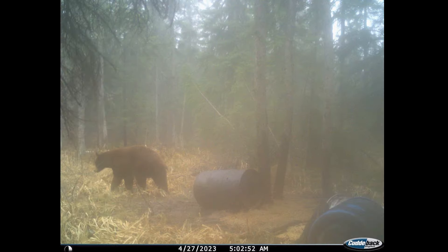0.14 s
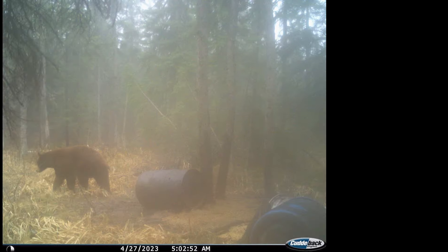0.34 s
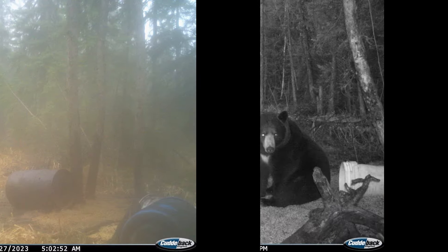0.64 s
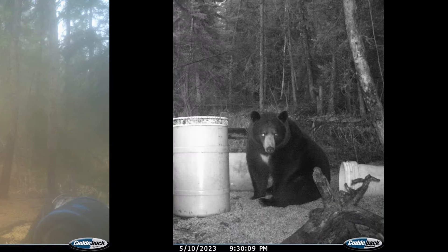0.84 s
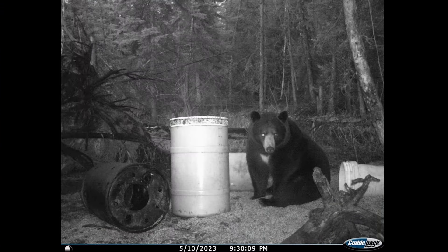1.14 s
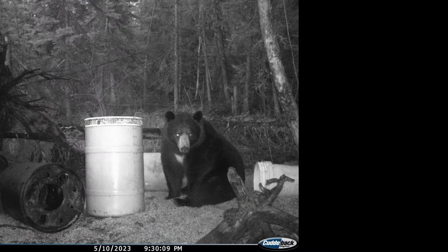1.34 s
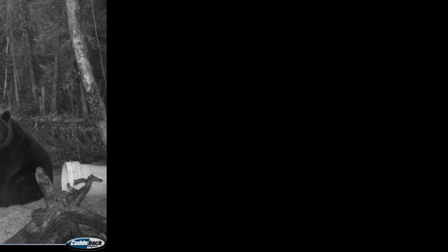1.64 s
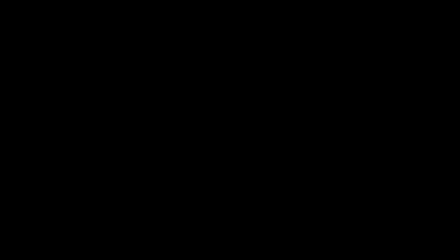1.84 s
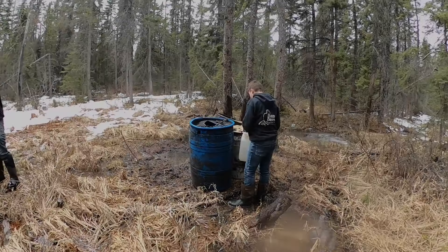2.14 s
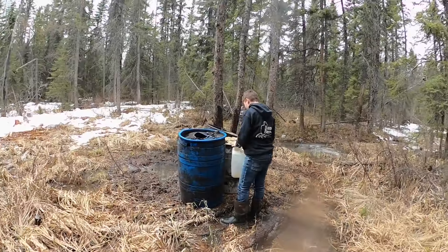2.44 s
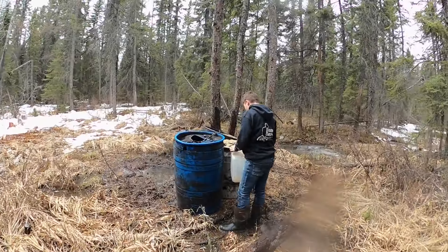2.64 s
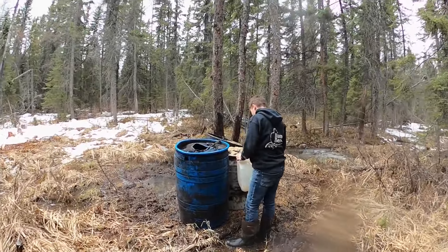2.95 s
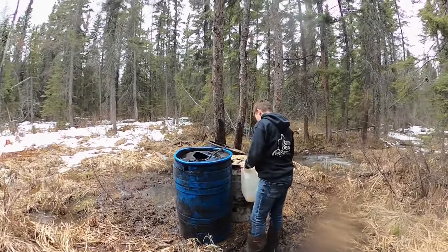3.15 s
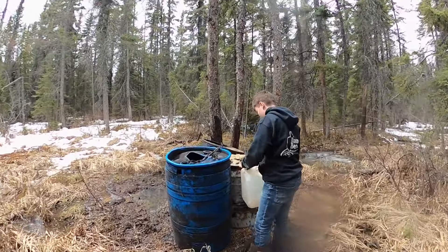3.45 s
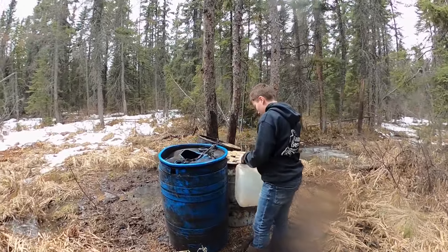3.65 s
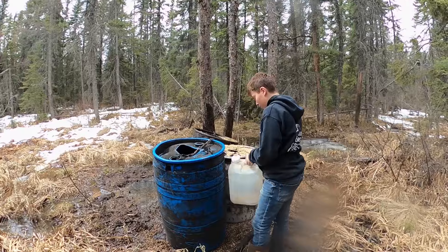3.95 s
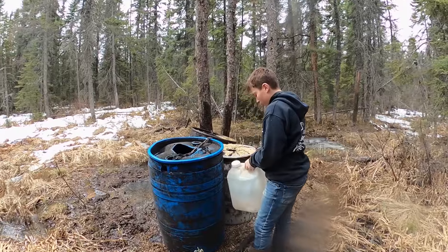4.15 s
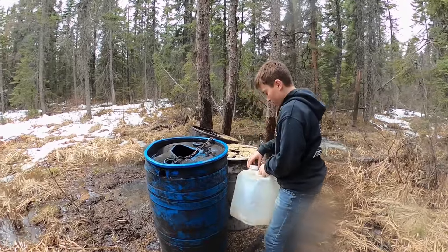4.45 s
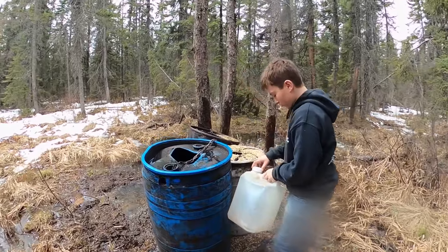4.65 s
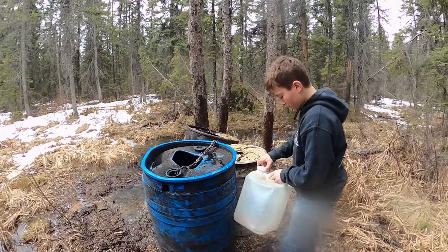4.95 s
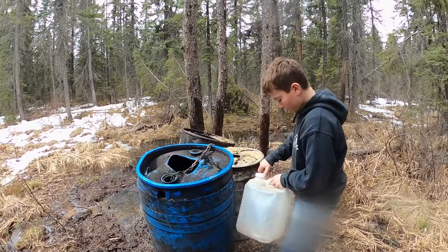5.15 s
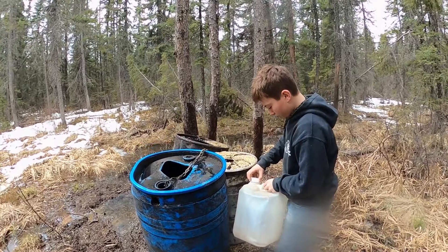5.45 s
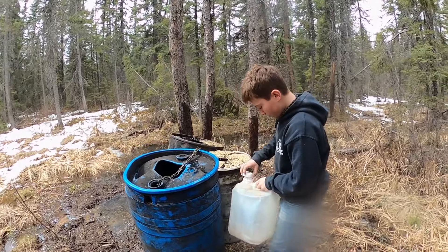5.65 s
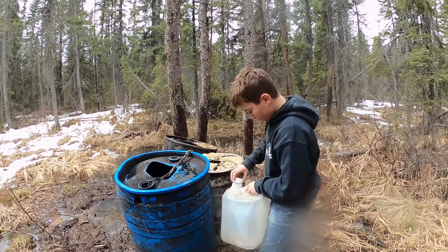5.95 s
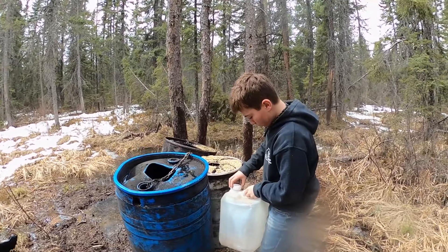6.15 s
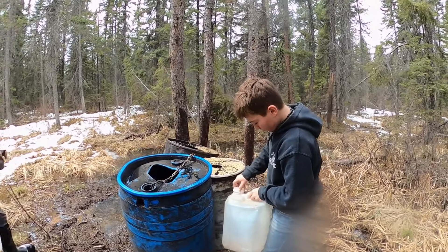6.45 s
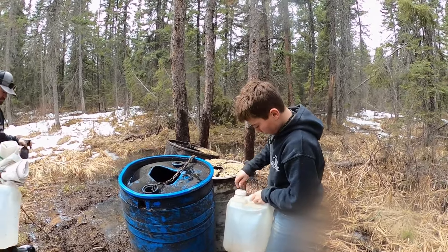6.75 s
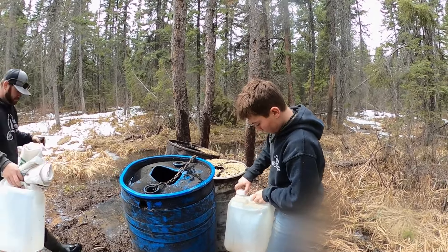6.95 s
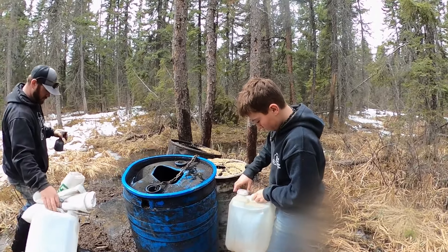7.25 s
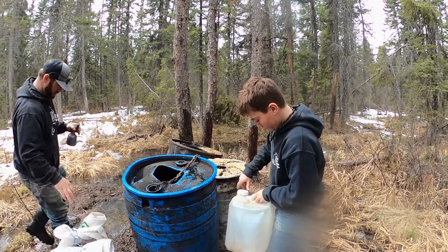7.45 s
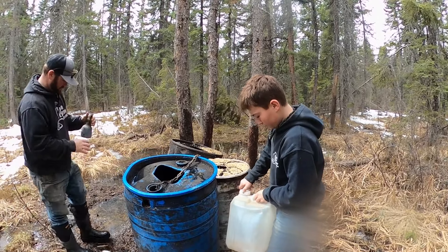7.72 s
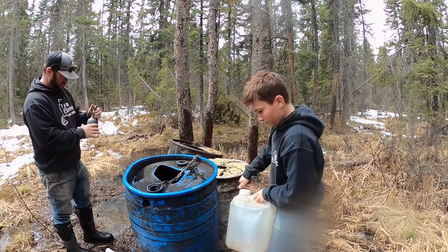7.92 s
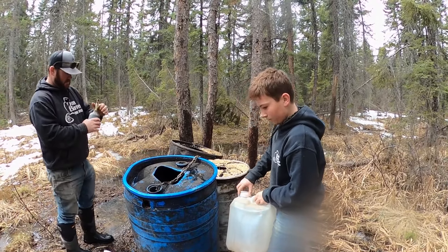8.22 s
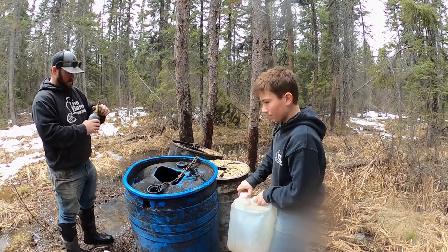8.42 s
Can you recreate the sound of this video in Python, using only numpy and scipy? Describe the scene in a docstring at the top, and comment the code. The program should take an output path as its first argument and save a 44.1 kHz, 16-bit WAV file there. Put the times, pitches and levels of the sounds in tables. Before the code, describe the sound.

Close stereo pickup in a still forest. First only soft air and two hard, dry clicks with small ticks. Rustling swells in and liquid bursts into lively slosh and gurgle, with a dense run of knocks and slaps. Looser splashes and brushing follow, leaning left, then several low, boomy plastic bumps as jugs land on soft ground. The last liquid calms quickly, leaving faint rustle.

```python
"""Plastic jugs of liquid are carried and set down beside a barrel on wet, grassy ground in a quiet wood.
Liquid splashes and glugs as ringing bubbles, hiss and gliding sines; hollow jug walls boom in a few modes.
Sacks and dry grass rustle as dense clicks over hiss; knocks and slaps are short resonant noise.
A latch clicks twice amid finger ticks, all in short ringing modes; wood air and wind are shaped noise."""
import sys
import numpy as np
from scipy import signal
from scipy.fft import rfft, irfft, next_fast_len
from scipy.io import wavfile
from scipy.ndimage import uniform_filter1d, minimum_filter1d

SR = 44100
rng = np.random.default_rng(int(sys.argv[2]) if len(sys.argv) > 2 else 0)


def undo_db(level):
    """Turn decibels back into plain size, where 20 dB means ten times bigger."""
    steps = np.asarray(level, float) / 20
    return 10 ** steps


def generate_wav(signal):
    """Clip the signal to [-1, 1] and save it as 16-bit WAV at the path in sys.argv[1]."""
    frames = np.transpose(np.atleast_2d(signal))
    scaled = np.clip(frames, -1, 1) * 32767
    pcm = np.round(scaled).astype(np.int16)
    wavfile.write(sys.argv[1], SR, pcm)


N = 378378

# Levels in the tables are nominal: each source adds its own trim.
# wood air, middle spectrum: (frequency [Hz], relative density [dB per Hz])
AIR_MID_SPECTRUM = [(30, -30), (100, -11.5), (180, -4), (330, -6.5), (500, -12.5), (900, -23), (1300, -15),
                    (1700, -18.5), (2100, -16), (2500, -28), (3100, -24.5), (4000, -37.5), (7500, -48),
                    (14000, -74)]
# wood air, left-minus-right spectrum: (frequency [Hz], relative density [dB per Hz])
AIR_SIDE_SPECTRUM = [(30, -17), (100, -8), (200, -10), (380, -14), (700, -29), (1300, -17), (2400, -21),
                     (4400, -34), (8000, -43), (14000, -58)]
# wood air level: (time [s], level [dB])
AIR_LEVEL = [(0, -60.5), (.3, -57.5), (.5, -63.5), (.9, -65.5), (1.2, -62), (1.6, -62.5)]
# latch snaps: (time [s], level [dB])
LATCH_SNAPS = [(.38168, -8.5), (1.38266, -8.5)]
# modes of one snap: (frequency [Hz], level [dB], t60 [s])
LATCH_MODES = [(800, -19, .013), (2700, -9, .007), (3900, 3, .0038), (6200, -5, .003), (9000, -10, .0025),
               (12000, -16, .002)]
# finger ticks: (time [s], level [dB], frequency [Hz])
FINGER_TICKS = [(.21, -35, 1900), (.346, -40, 5500), (0.406, -18.5, 1220), (.837, -41, 1400),
                (.85, -37, 7500), (0.9936, -24, 1060), (1.39, -18.5, 1100), (8.2, -23, 7800),
                (8.11, -42, 8000), (7.857, -34, 5000)]
# sacks and grass brushed in passing:
# (time [s], rustle level [dB], treble lean to the left [dB], gain of the rustle's top [dB])
BRUSHING = [(.95, -76, 0, -10), (1.1, -70.5, -5, -3), (1.3, -65.5, -5, -2), (1.44, -59.5, -3, -14),
            (1.7, -53.5, 4, 14), (1.84, -42.5, 3, 5.5), (2.2, -45.5, 3.5, 9.5), (2.3, -50.5, 3, 7.5),
            (2.5, -37, 2, 5), (2.62, -44.5, 3, 4.5), (2.88, -43, 1.5, -12), (2.94, -56, 5, -1.5),
            (3.02, -48.5, 0.5, 4), (3.19, -69, 2, 17), (3.22, -45.5, 3, 3), (3.7, -43.5, 0.5, -6),
            (4.0, -49.5, 1, -0.5), (4.2, -46.5, 5, -1), (4.27, -38, 2.5, 8.5), (4.5, -36.5, 3.5, 3),
            (4.72, -55.5, 2, -2), (4.96, -46.5, 5, -4.5), (5.01, -36.5, 1, -7), (5.15, -38.5, 9, 6),
            (5.27, -38.5, 5.5, 3), (5.4, -34, 10.5, 6), (5.45, -37.5, 2, -4.5), (5.9, -40, 5.5, -1.5),
            (5.96, -42.5, 7.5, -4), (6.3, -44, 4, -0.5), (6.37, -35, 7, -6), (6.7, -36, 5.5, 8),
            (6.78, -39.5, 9.5, -3), (7.0, -46, 1.5, 2), (7.25, -44, 7, -9), (7.5, -53, 1, 3.5),
            (7.59, -61.5, 6.5, 3), (7.7, -53.5, 4, 3), (7.88, -45, 7.5, -3), (8.12, -51, 6.5, -26),
            (8.28, -59, 5, -7), (8.4, -56.5, 2, -4), (8.58, -63, 4, -10)]
# rustle spectrum: (frequency [Hz], relative density [dB per Hz])
RUSTLE_SPECTRUM = [(500, -73), (1000, -1), (1900, -0.5), (3500, -0.5), (5300, -2), (6500, 1), (7800, -0.5),
                   (10000, -10), (13000, -20.5), (16000, -37)]
# surges of liquid in the jug: (time [s], splash level [dB], wall boom over splash [dB],
# end of hold after the start [s], boom's fall by 20 dB, 0.01 at least [s])
SURGES = [(2.264, -58, 15, 0.023, 0.2), (2.36, -33, -9, .08, 0.82), (2.463, -27, -13, .07, -0.07),
          (2.522, -24, -9, 0.032, 0.17), (2.577, -24.5, -25, 0.11, -0.22), (2.637, -26.5, -3, 0.101, -0.1),
          (2.722, -28, -15, .05, .2), (2.938, -45.5, -2, 0.063, 0.4), (3.129, -46, 10.5, 0.034, 0.75),
          (3.211, -26.5, -10, 0.13, 0.46), (3.394, -27, -9.5, 0.15, 0.35), (3.64, -28.5, -13, 0.13, 0.09),
          (3.768, -37, -16, 0.26, -0.24), (4.025, -44.5, 1.5, 0.043, 0.6), (4.273, -33, -6, 0.065, 0.65),
          (4.378, -29.5, -14, 0.019, 0.32), (4.487, -37, -19, .06, 0), (4.78, -43, -9, .04, 2),
          (4.832, -37, 14.5, 0.038, 0.3), (5.014, -35, 1, .14, .08), (5.315, -35.5, -17, 0.11, -1.9),
          (5.414, -39, 2.5, 0.098, -1), (5.516, -34, 8.5, 0.054, 0.31), (5.694, -35, 11, 0.082, -0.05),
          (6.043, -39, -6, 0.029, 1.2), (6.154, -36.5, 7, 0.018, 0.63), (6.336, -28.5, -12, 0.1, 0.54),
          (6.55, -29, -3, 0.12, -0.67), (6.624, -29, 6, 0.092, -0.47), (6.979, -43, 17.5, 0.022, 0.15),
          (7.051, -30.5, 5.5, 0.042, 0.35), (7.12, -33, 6.5, .1, -0.1), (7.276, -39.5, -8, 0.081, 1.7),
          (7.382, -33.5, 11, 0.045, 0.13), (7.483, -28.5, 14, 0.013, 0.04),
          (7.602, -25, -12.5, 0.017, 0.35), (7.626, -28.5, 16.5, 0.053, 0.0755),
          (7.688, -44, 33.5, 0.095, 0.01), (7.787, -29.5, 13.5, 0.062, 0.124),
          (7.88, -44, 7.5, 0.025, 0.67), (8.243, -59.5, 17, 0.11, 0), (8.373, -47, 3.5, 0.042, 0.3)]
# rate of fall against the boom's, one row each for splash, slosh, boom: (factor [1])
FALL_RATE = [
    [1.65],
    [1.77],
    [1.],
]
# how the liquid moves: (time [s], deep bubbles over splash [dB], bubble share of power, rest hiss [0-1],
# small over large bubbles [dB per octave])
LIQUID_MOTION = [(1.5, -5.5, 0.63, -8), (2.5, -11, 0.68, 3.5), (2.7, -2.5, 0.75, -8),
                 (3.2, -5.5, 0.85, 6.5), (3.65, -2, 0.73, -2.5), (4.2, -10, 0.5, 1),
                 (4.85, -6.5, 0.64, -3.5), (5.3, -16, .55, 4.5), (6.0, -8, 0.62, 0), (6.4, -10, 0.2, 0),
                 (7.0, -13.5, .75, 4.5), (7.3, -12, .7, 8.5), (7.5, -2.5, 0.3, -2), (7.7, -0.5, 0.45, -14),
                 (7.85, -18, 0.54, -0.5), (8.58, -10, 0.8, -0.5)]
# drummed wall modes of the jug: (frequency [Hz], level [dB], twice the t60 [s])
JUG_MODES = [(101, -43, 0.24), (144.4, -10, 1), (175, -7, 0.83), (202.7, -3, 0.11), (256.8, -0.5, 0.19),
             (306.4, -11.5, 0.32), (392, -17.5, 0.031)]
# bumps on the jug: (time [s], level [dB], favoured pitch [Hz], t60 under the hand, kept to 0.02-0.4 [s])
BUMPS = [(2.382, -29, 199, 0.18), (2.534, -14, 188, 0.12), (2.557, -15.5, 217, 0.065),
         (2.633, -24, 218, 0.18), (2.718, -18, 261, 0.15), (3.175, -23.5, 198, 0.47),
         (3.244, -18.5, 199, 0.16), (3.363, -14, 175, 0.06), (3.437, -16, 368, 0.087),
         (3.468, -12.5, 400, 0.17), (3.649, -8.5, 355, 0.056), (3.692, -8.5, 226, 0.064),
         (4.068, -27.5, 158, 0.25), (4.527, -35, 340, 0.12), (4.575, -26, 330, 0.055),
         (4.839, -8, 170, 0.3), (4.864, -15.5, 247, 0.16), (4.924, -20.5, 127, 0.33),
         (5.031, -24, 254, 0.32), (5.122, -26.5, 263, 0.26), (5.42, -24.5, 183, 0.41),
         (5.531, -28, 251, 0.12), (5.7, -24, 176, 0.52), (5.734, -19.5, 254, 0.19),
         (6.159, -25.5, 256, 0.22), (6.244, -29, 204, 0.37), (6.511, -23, 175, 0.2), (6.62, -23, 226, 0.33),
         (6.986, -11, 178, 0.12), (7.042, -7.5, 284, 0.082), (7.124, -20, 393, 0.49),
         (7.39, -16, 288, 0.093), (7.485, -6.5, 246, 0.091), (7.613, -23, 210, 0.16),
         (7.641, -5.5, 273, 0.3), (7.883, -31, 243, 0.17), (8.294, -34, 175, 0.14)]
# knocks and slaps: (time [s], level [dB], pitch [Hz], spray over body [dB], body t60, 0.02 at least [s])
SLAPS = [(2.351, -36.5, 1900, 6.5, 0.075), (2.37, -30, 1420, -11, 0.084), (2.401, -23, 1240, -14, 0.07),
         (2.469, -18.5, 2050, -4.5, 0.083), (2.526, -18.5, 1370, -1.5, 0.092),
         (2.553, -16.5, 3140, -6, 0.075), (2.601, -29, 1240, -16, 0.091), (2.635, -20, 1120, -20.5, 0.075),
         (2.72, -12.5, 1910, -26, 0.088), (2.793, -42, 1130, -13, 0.065), (2.831, -28, 713, -14, 0.13),
         (2.868, -28.5, 1300, -13, 0.12), (2.965, -28, 2310, -35, 0.075), (3.142, -34, 1220, -5, 0.075),
         (3.208, -28.5, 1760, 6.5, 0.099), (3.249, -24, 1610, 4, 0.068), (3.276, -16.5, 1800, -25, 0.075),
         (3.302, -15, 1580, -2, 0.055), (3.335, -19.5, 1410, -17, 0.11), (3.358, -10.5, 1960, -10, 0.065),
         (3.378, -15, 1500, -24, 0.085), (3.424, -21, 1950, -14.5, 0.099), (3.471, -15, 2200, -12.5, 0.081),
         (3.55, -12.5, 2120, -18.5, 0.067), (3.593, -32, 1070, -33, 0.075), (3.649, -22, 1030, -11, 0.14),
         (3.893, -24.5, 1050, -25, 0.082), (3.952, -24, 1940, -21, 0.1), (4.212, -30.5, 1150, -16, 0.063),
         (4.402, -20, 1140, -40, 0.044), (4.413, -12, 1520, -39, 0.078), (4.515, -18.5, 1570, -23, 0.071),
         (4.836, -24.5, 820, -23, 0.075), (4.967, -34, 1160, -21, 0.069), (5.328, -28, 2740, -8, 0.075),
         (5.653, -19, 1350, -18, 0.079), (5.731, -19, 790, -9, 0.081), (5.914, -28.5, 1920, -5, 0.053),
         (6.003, -30, 2360, -9, 0.071), (6.156, -24, 1110, -25, 0.075), (6.242, -20.5, 1160, -29, 0.058),
         (6.346, -22, 1420, -9, 0.11), (6.621, -22.5, 1450, -18, 0.092), (6.982, -22, 1080, -35, 0.061),
         (7.041, -15.5, 1500, -37, 0.08), (7.124, -17.5, 1170, -20, 0.1), (7.226, -23.5, 1420, -32, 0.16),
         (7.292, -26.5, 2020, -38, 0.095), (7.39, -24, 1000, -18, 0.097), (7.481, -15.5, 850, -36, 0.06),
         (7.605, -21.5, 931, -10.5, 0.11), (7.623, -18, 1270, -5, 0.077), (7.796, -20.5, 2500, -8, 0.11),
         (7.885, -30, 1640, -29, 0.075), (8.098, -40, 3220, -1.5, 0.065), (8.152, -34.5, 3200, -11, 0.054)]
# air pockets closing: (time [s], level [dB], start pitch [Hz], end pitch [Hz], glide length [s])
GLUGS = [(2.722, -9.5, 210, 620, 0.01), (2.69, -17.5, 680, 620, 0.011), (2.635, -23, 485, 740, 0.0297),
         (3.94, -32.5, 580, 810, 0.0339), (4.402, -21, 890, 3800, 0.027), (4.2, -25.5, 340, 590, 0.019),
         (4.805, -34, 1600, 1200, 0.02), (7.296, -23, 1500, 2200, 0.0153), (3.8, -30, 397, 620, 0.0048)]


def rms_one(x):
    """Scale to unit rms."""
    return x / np.sqrt(np.mean(x ** 2) + 1e-20)


def in_time(rows):
    """Columns of a curve table, one value a sample."""
    time_s, *columns = np.transpose(rows)
    return [np.interp(np.arange(N) / SR, time_s, column) for column in columns]


def colour(x, spectrum):
    """Shape a steady sound by a spectrum in dB over log frequency; rms 1."""
    size = next_fast_len(N)
    hz, db = np.transpose(spectrum)
    log_hz = np.log(np.arange(size // 2 + 1) * SR / size + 1)
    shaped = rfft(x, size) * undo_db(np.interp(log_hz, np.log(hz), db))
    return rms_one(irfft(shaped, size)[..., :N])


def cut(x, hz, kind, order=2):
    """Butterworth filter."""
    return signal.sosfilt(signal.butter(order, hz, kind, fs=SR, output="sos"), x)


def cut_in_phase(x, hz, order):
    """Zero-phase high-pass: Butterworth run forward and back."""
    return signal.sosfiltfilt(signal.butter(order, hz, "high", fs=SR, output="sos"), x)


def drift(rate_hz):
    """Slow chance: two-pole smoothed noise at every 20th sample, spread 1."""
    r = np.exp(-40 * np.pi * rate_hz / SR)
    noise = rng.standard_normal(N // 20 + 2002)
    slow = signal.lfilter([1], [1, -2 * r, r * r], noise)[2000:]
    return np.interp(np.arange(N) / 20, np.arange(len(slow)), rms_one(slow))


def ring(x, hz, t60_s):
    """Two-pole resonator: a unit click sets a dying sine of height 1 ringing."""
    r, w = undo_db(-60 / (t60_s * SR)), 2 * np.pi * hz / SR
    return signal.lfilter([0, np.sin(w)], [1, -2 * r * np.cos(w), r * r], x + 1e-18)


def blip(hz, cycles, rise):
    """A sine dying by 40 dB while its pitch shifts by the fraction rise."""
    u = np.arange(round(cycles / hz * SR)) / SR * hz / cycles
    return np.sin(2 * np.pi * cycles * (u + rise * u ** 2 / 2)) * undo_db(-40 * u)


def grains(per_s, spread_db, clump_db):
    """Random clicks of uneven size that come in clumps."""
    sizes = undo_db(spread_db * np.minimum(rng.exponential(1, N), 3.3)) * rng.choice([-1, 1], N)
    return sizes * (rng.random(N) < per_s * undo_db(clump_db * drift(25)) / SR)


def add(out, time_s, sound):
    """Mix a short sound in at a time."""
    i = round(time_s * SR)
    out[i:i + len(sound)] += sound[:N - i]


def wood_air():
    """The faint, smooth air of the wood from all around: unrelated middle and side noise."""
    level_db, = in_time(AIR_LEVEL)
    mid = colour(rng.standard_normal(N), AIR_MID_SPECTRUM)
    side = undo_db(-0.5) * colour(rng.standard_normal(N), AIR_SIDE_SPECTRUM)
    return undo_db(level_db + drift(5)) * np.array([mid + side, mid - side])


def port_wind():
    """Faint lumps of wind rumble, partly separate in each microphone port."""
    both, left, right = cut(rng.standard_normal((3, N)), [25, 70], "band")
    return undo_db(-88 + 8.0 * drift(4)) * rms_one(both + .3 * np.array([left, right]))


def latch():
    """Each snap rings the same short modes; fingers tick dully nearby."""
    out, click = np.zeros(N), np.eye(1, 1500)[0]
    rise_s = .00011
    snap = np.zeros(1500)
    for k, (hz, db, t60_s) in enumerate(LATCH_MODES):
        # neighbouring modes start in opposite directions
        snap -= (-1) ** k * undo_db(db) * ring(click, hz, t60_s)
    snap *= np.minimum(np.arange(1500) / (rise_s * SR), 1)
    for time_s, level_db in LATCH_SNAPS:
        add(out, time_s, undo_db(level_db) * snap)
    for time_s, level_db, hz in FINGER_TICKS:
        tick = ring(click, hz, 5.1 / hz) + 0.11 * ring(click, 4800, 0.0031)
        add(out, time_s, undo_db(level_db) * tick)
    return out


def rustle(level_db, crisp_db):
    """Woven sacks and dry grass: dense fine crackle over a rubbing hiss; two unrelated patches."""
    crackle = np.array([rms_one(grains(4600, spread_db=11.5, clump_db=3.0)) for patch in range(2)])
    rub = 2.34 * rng.standard_normal((2, N))
    sound = colour(crackle + rub, RUSTLE_SPECTRUM)
    top = cut_in_phase(sound, 6300, order=2)
    return undo_db(level_db + 1.5 + 1.6 * drift(28)) * (sound + (undo_db(crisp_db) - 1) * top)


def liquid_levels(rustle_db, deep_db):
    """Splash, slosh, boom levels [dB]: surges rise fast, hold, fall, over lapping that follows movement."""
    lap_over_rustle_db = np.array([[-4], [-4], [-14]])
    surge_rise_s = 0.0056
    slosh_share_of_boom = 0.44   # of the boom's dB over the splash
    bump_slosh_db, bump_slosh_fall_s = -18.5, 0.038   # over the bump; fall by 20 dB
    clock_s = np.arange(N) / SR
    coarse_s = clock_s[::20]
    power = undo_db(2 * (rustle_db[::20] + lap_over_rustle_db))
    for time_s, splash_db, boom_db, hold_s, fall_s in SURGES:
        t = coarse_s - time_s
        fall_db = -20 * np.maximum(t - hold_s, 0) / max(fall_s, .01) * np.array(FALL_RATE)
        levels_db = splash_db + np.array([[0], [slosh_share_of_boom * boom_db], [boom_db]])
        power = power + (np.clip(t / surge_rise_s, 0, 1) * undo_db(levels_db + fall_db)) ** 2
    power[1] *= undo_db(2 * deep_db[::20])
    # a bump shakes deep bubbles loose
    for time_s, bump_db, *spot in BUMPS:
        t = coarse_s - time_s
        shaken_db = bump_db + bump_slosh_db - 20 * np.abs(t) / bump_slosh_fall_s
        power[1] += (t > 0) * undo_db(2 * shaken_db)
    return [np.interp(clock_s, coarse_s, 10 * np.log10(p)) for p in power]


def bubbles(level_db, wetness, small_db, low_hz, high_hz, per_s, cycles):
    """Bubbles ring a few cycles at scattered, rising pitches; where it is drier a plain hiss takes over."""
    born, dealt = grains(per_s, spread_db=6, clump_db=5.5), rng.integers(0, 12, N)
    pitches_hz = np.geomspace(low_hz, high_hz, 12)
    rings = 0
    for k, hz in enumerate(pitches_hz):
        strength = undo_db(small_db * np.log2(hz / pitches_hz[4]))
        births = born * (dealt == k) * strength
        rings = rings + signal.oaconvolve(births, blip(hz, cycles, rise=0.36))[:N]
    hiss = rms_one(cut(rng.standard_normal(N), [low_hz, 1.265 * high_hz], "band", order=3))
    top = cut_in_phase(hiss, pitches_hz[7], order=1)
    hiss = hiss + (undo_db(small_db) - 1) * top
    wetness = np.clip(wetness, 0, 1)
    return undo_db(level_db) * (np.sqrt(wetness) * rms_one(rings) + np.sqrt(1 - wetness) * hiss)


def jug(boom_db):
    """Liquid drums the walls without pause, bumps strike them; both ring the same mode pitches."""
    drumming, struck = 0, np.zeros(N)
    hz, level_db, double_t60_s = np.transpose(JUG_MODES)
    for k in range(len(JUG_MODES)):
        push = grains(260, spread_db=5.0, clump_db=2.5)
        drumming = drumming + undo_db(level_db[k]) * rms_one(ring(push, hz[k], 0.5 * double_t60_s[k]))
    t = np.arange(round(.4 * SR))[:, None] / SR
    chance = rng.standard_normal((len(BUMPS), 2, len(JUG_MODES)))
    for (time_s, bump_db, favoured_hz, t60_s), (luck, phase) in zip(BUMPS, chance):
        near_db = -14.0 * np.abs(np.log2(hz / favoured_hz))   # the spot that is hit favours nearby modes
        fade_db = -60 * t / np.clip(t60_s, .02, .4)
        modes = undo_db(near_db + 3.5 * luck + fade_db) * np.sin(2 * np.pi * hz * t + 0.45 * phase)
        modes = modes * np.minimum(t / 0.0031, 1)
        add(struck, time_s, undo_db(bump_db - 7.0) * modes.sum(axis=1))
    return undo_db(boom_db - 6.5) * rms_one(cut(drumming, 1100, "low")) + cut(struck, 600, "low")


def slaps():
    """A crack with a dying puff of resonant noise, a briefer wide puff and a ragged bright spray."""
    slap_rise_s, spray_rise_s = 0.00051, 0.0017
    out, t = np.zeros(N), np.arange(round(.15 * SR)) / SR
    noise = rng.standard_normal((len(SLAPS), 3, len(t)))
    for (time_s, level_db, hz, spray_db, t60_s), (wet, fine, rag) in zip(SLAPS, noise):
        fade_db = -60 * t / max(t60_s, .02)
        body = rms_one(ring(ring(wet, hz, 8 / hz), hz, 9 / hz)) * undo_db(fade_db)
        wide = rms_one(cut(cut(wet, [500, 3500], "band"), 8400, "low"))
        wide = 0.74 * wide * undo_db(1.66 * fade_db)
        ragged_db = 4.5 * rms_one(cut(rag, 225, "low"))
        spray = rms_one(cut(fine, [4500, 10000], "band", order=3))
        spray = spray * undo_db(spray_db + 0.61 * fade_db + ragged_db)
        crack = cut(blip(hz, 4.5, rise=-0.03), 5000, "low")
        add(out, time_s, undo_db(level_db - 6.5) * np.minimum(t / slap_rise_s, 1) * (body + wide))
        add(out, time_s, undo_db(level_db - 6.0) * np.minimum(t / spray_rise_s, 1) * spray)
        add(out, time_s, undo_db(level_db - 3.0) * crack)
    return out


def glugs():
    """A closing air pocket sings with a gliding, wobbling pitch and dies."""
    out = np.zeros(N)
    wobbles = rng.standard_normal((len(GLUGS), 2, round(.1 * SR)))
    for (time_s, level_db, start_hz, end_hz, glide_s), wobble in zip(GLUGS, wobbles):
        u = np.arange(round(2 * glide_s * SR)) / (glide_s * SR)
        pitch, swell = rms_one(cut(wobble, 176, "low"))[:, -len(u):]
        hz = (start_hz + (end_hz - start_hz) * np.minimum(u, 1)) * (1 + .09 * pitch)
        shape = np.minimum(25.0 * u, 1) * np.exp(-1.6 * u ** 2) * undo_db(1.6 * swell)
        add(out, time_s, undo_db(level_db) * np.sin(2 * np.pi * np.cumsum(hz) / SR) * shape)
    return out


def stereo(x, other, pan_db):
    """Close microphone ports: bass alike in both, treble panned, scattered and partly unrelated."""
    lean = np.tanh(pan_db * np.log(10) / 40)
    t = np.arange(round(.04 * SR)) / SR
    echo = rng.standard_normal(len(t)) * undo_db(-60 * t / .05) * (t > .001)
    scatter = signal.fftconvolve(x, echo / np.linalg.norm(echo))[:N]
    panned = 1.08 * lean * cut(x, 12000, "low", order=1)
    side = panned + undo_db(-13.5) * scatter + undo_db(-7.5) * other
    side = cut_in_phase(side, 960, order=4)
    return np.array([x + side, x - side])


def scene():
    """Moving sources share one moving direction; latch slightly left; air all around."""
    rustle_db, pan_db, crisp_db = in_time(BRUSHING)
    deep_db, wetness, small_db = in_time(LIQUID_MOTION)
    splash_db, slosh_db, boom_db = liquid_levels(rustle_db, deep_db)
    splash = bubbles(splash_db - 5.0, wetness, small_db, low_hz=1002, high_hz=2730, per_s=600, cycles=18.0)
    slosh = bubbles(slosh_db, wetness, small_db / 2, low_hz=359, high_hz=805, per_s=300, cycles=9.4)
    near, far = rustle(rustle_db, crisp_db)
    moving = near + splash + slosh + jug(boom_db) + slaps() + glugs()
    return stereo(moving, far, pan_db) + latch() * undo_db([[.6], [-.6]]) + wood_air()


def roll_off(x):
    """The treble ends steeply here."""
    return signal.sosfilt(signal.butter(12, 15900, fs=SR, output="sos"), x)


def record(dry):
    """The microphone drops the deep bass, wind touches its ports, a fast limiter holds the peaks."""
    x = cut(dry, 137.6, "high", order=4) + port_wind()
    room_left = np.minimum(1, .4 / (np.abs(x).max(axis=0) + 1e-9))
    gain = uniform_filter1d(minimum_filter1d(room_left, size=441), size=441)   # 10 ms windows
    return roll_off(x * gain)


dry = scene()
out = record(dry)
generate_wav(out)
```